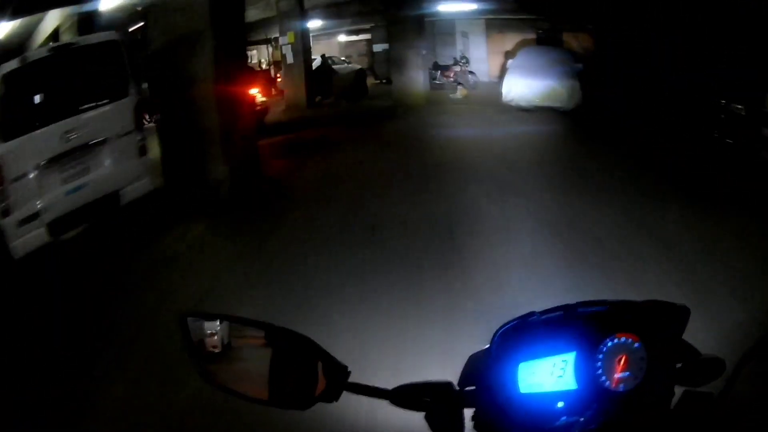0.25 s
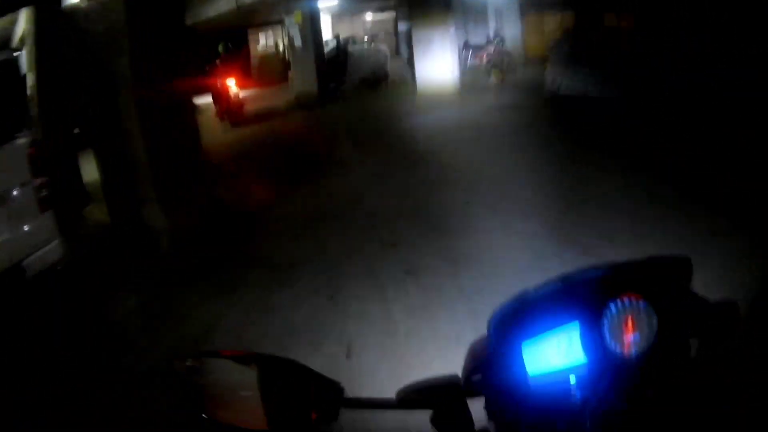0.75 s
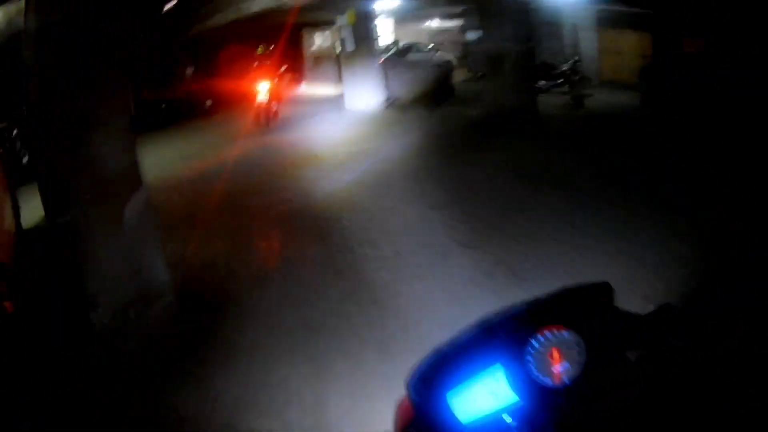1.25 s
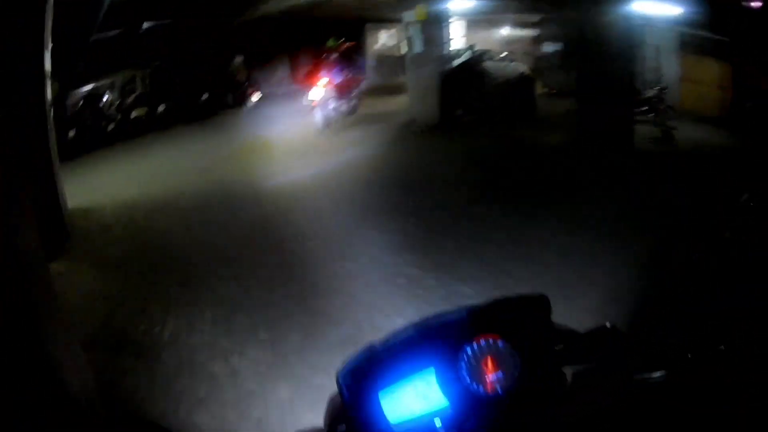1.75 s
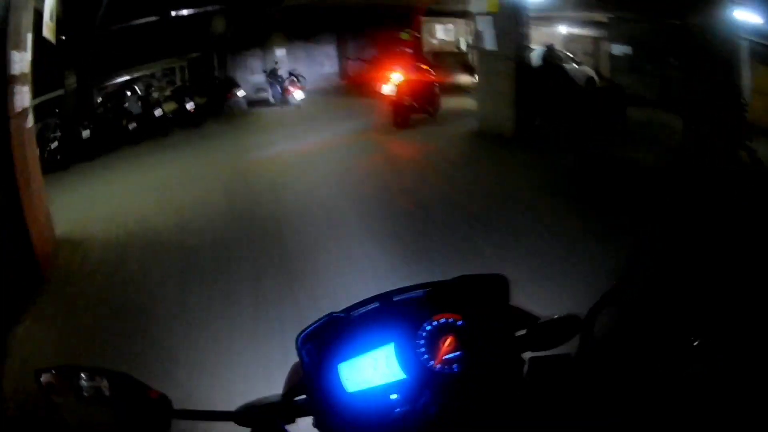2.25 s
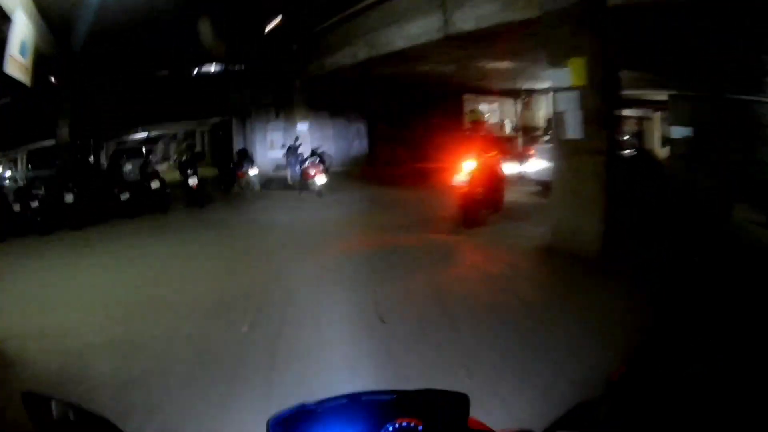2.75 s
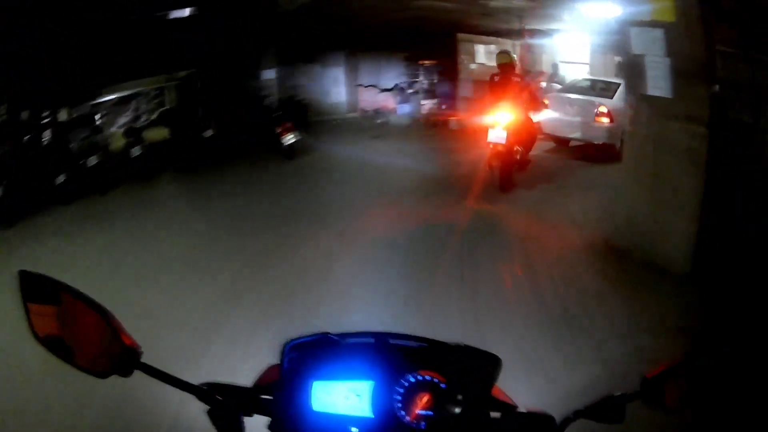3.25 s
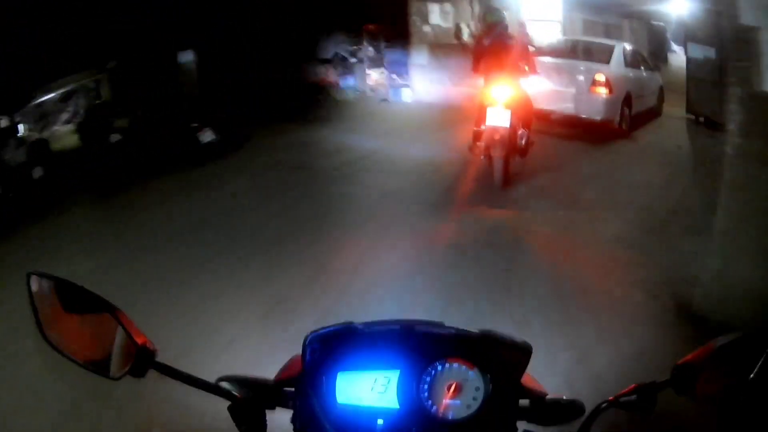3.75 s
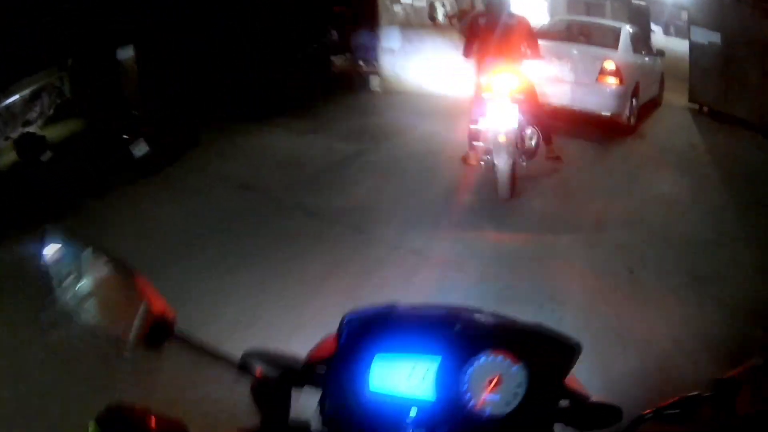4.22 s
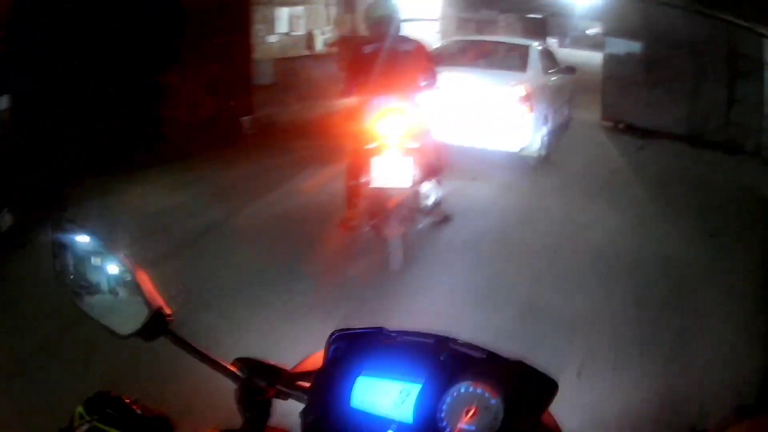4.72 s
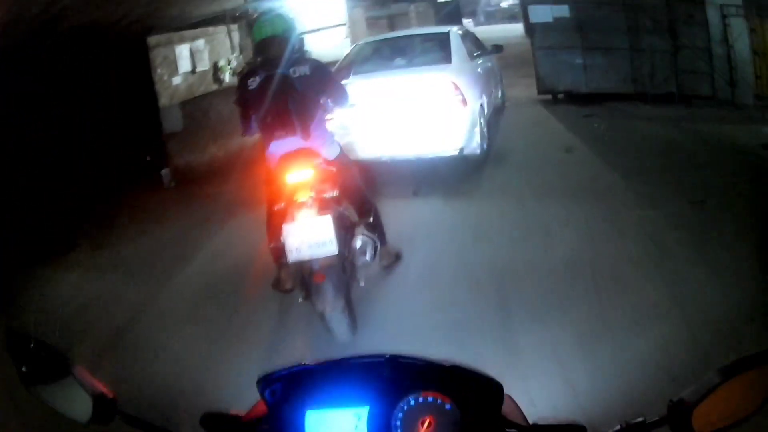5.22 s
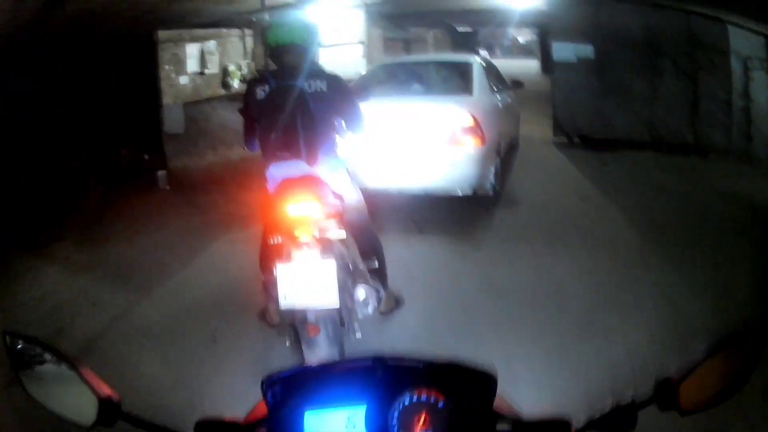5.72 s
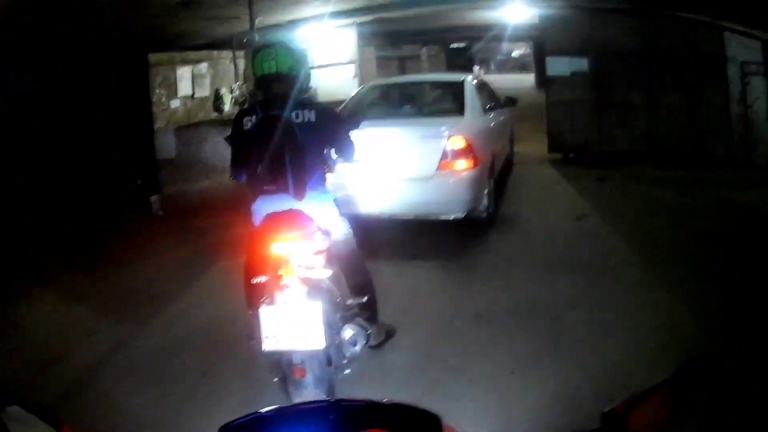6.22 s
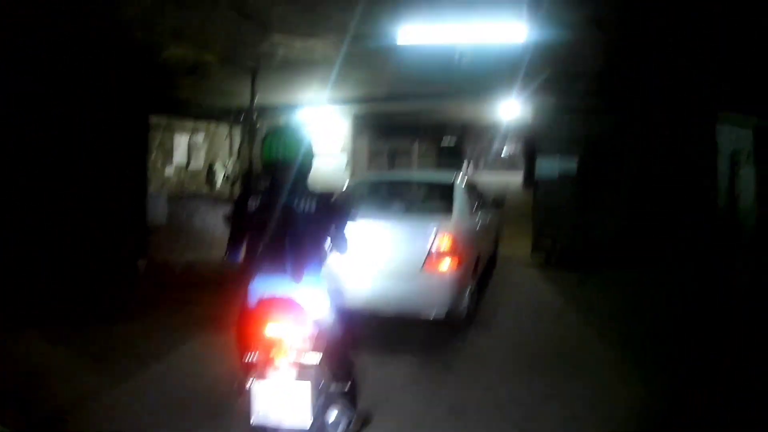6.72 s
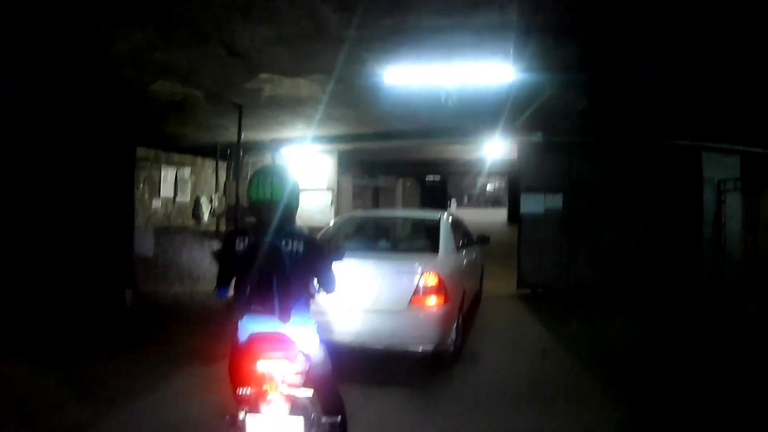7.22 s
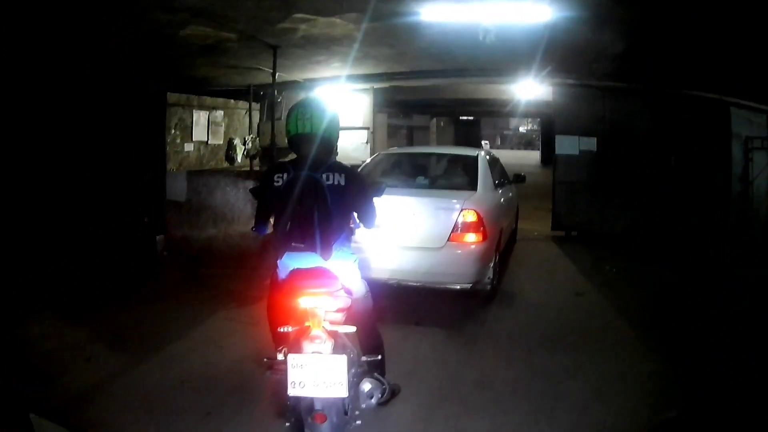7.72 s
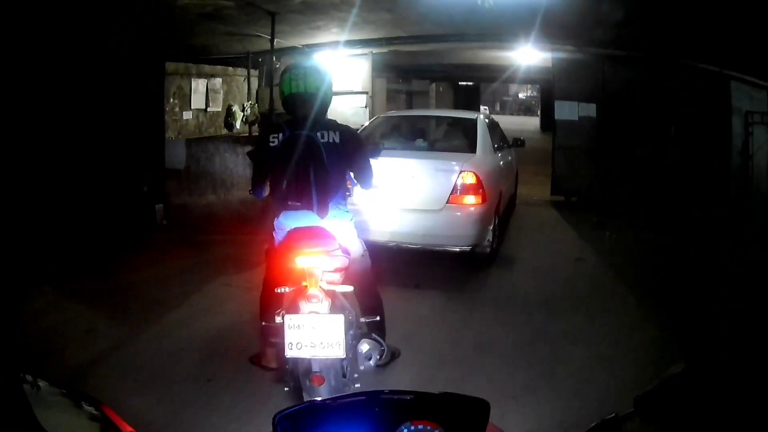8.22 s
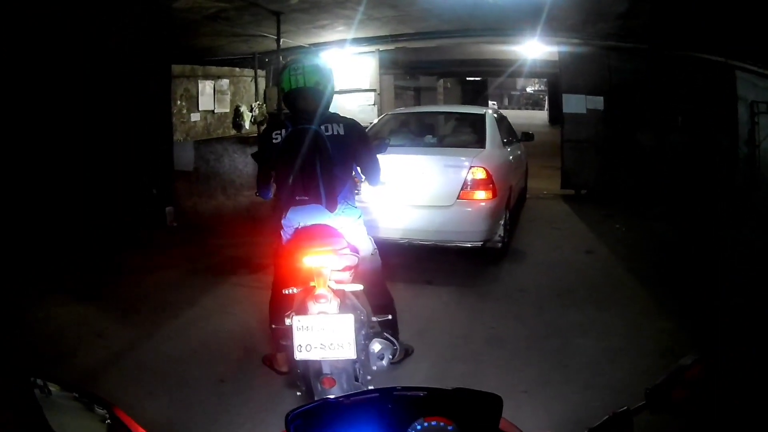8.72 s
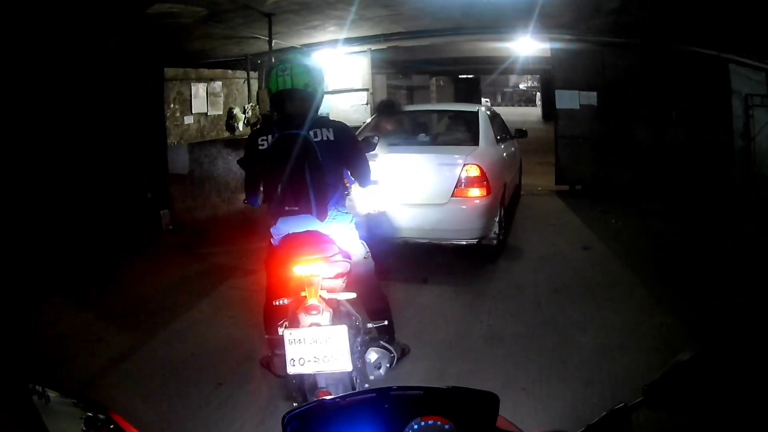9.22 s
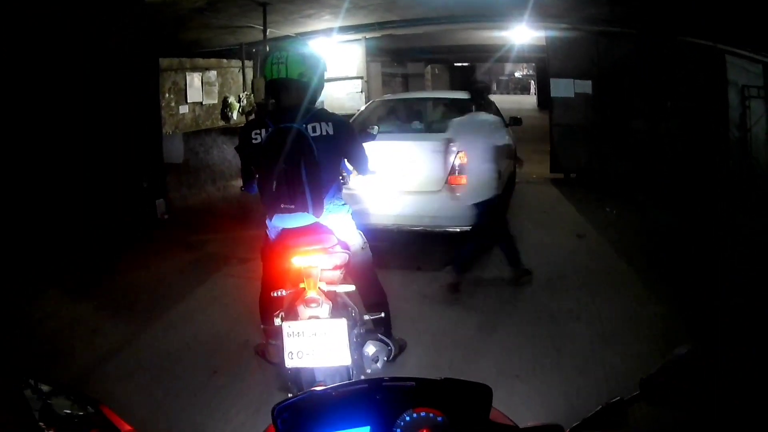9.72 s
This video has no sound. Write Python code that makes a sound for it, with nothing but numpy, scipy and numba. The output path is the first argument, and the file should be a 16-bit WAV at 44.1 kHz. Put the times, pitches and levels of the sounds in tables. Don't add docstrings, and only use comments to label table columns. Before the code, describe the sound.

A single-cylinder motorcycle putters through an echoing concrete garage, revs briefly, bangs once as the throttle shuts, then idles with a faint brake squeal.

```python
import sys
import numpy as np
from scipy import signal
from scipy.fft import rfft, irfft
from scipy.io import wavfile
from scipy.ndimage import uniform_filter1d
from numba import njit

SR = 44100
rng = np.random.default_rng(int(sys.argv[2]) if len(sys.argv) > 2 else 0)


def wav_out(sig):
    wavfile.write(sys.argv[1], SR, np.round(np.clip(np.atleast_2d(sig).T, -1, 1) * 32767).astype(np.int16))


def convert_level_to_amplitude(level_db):
    exponent = np.asarray(level_db, float) / 20
    return 10 ** exponent


N = 439677

# t/s, firings so far
CRANK = [(.005, 0), (1.618, 16), (1.754, 18), (1.926, 21), (2.268, 28), (2.75, 37), (2.959, 40),
         (3.094, 42), (3.443, 45), (3.612, 47), (4.526, 56), (5.272, 64), (5.886, 70), (6.655, 78),
         (7.568, 87), (8.987, 101), (9.306, 105), (9.99, 115)]
MISFIRES = [41, 80, 86, 96, 99]
LEAN_FIRINGS = [0, 10, 36, 60, 61, 64, 66, 67, 68, 72, 79, 82, 90, 92, 100, 103]
# t/s, peak level/dB
HARD_FIRINGS = [(.707, -13), (.82, -12), (.92, -14), (1.08, -14), (8.686, -14), (1.754, -9), (1.825, -8),
                (2.323, -6), (2.365, -6), (2.432, -5), (2.477, -6), (2.543, -6), (2.643, -6), (3.094, -10),
                (3.324, -12), (3.443, -13), (4.526, -10), (4.623, -11), (4.805, -11), (5.098, -11),
                (6.268, -14), (6.655, -13), (6.972, -14), (7.273, -11), (7.568, -10), (7.77, -14),
                (8.987, -8), (7.984, -13), (9.513, -7), (9.779, -11)]
# t/s, peak level/dB
OFF_BEAT = [(.97, -17), (3.077, -11), (3.156, -11), (3.484, -15), (3.567, -16), (3.651, -18), (4.155, -19),
            (4.371, -18), (4.95, -19), (6.113, -18), (6.426, -20), (7.425, -18), (7.718, -18), (8.347, -17),
            (8.454, -19), (8.524, -19), (8.75, -15)]
# t/s, firing peak level/dB, pipe growl level/dB, low pipe mode against growl/dB, valve gear level/dB
ENGINE = [(0, -14.5, -29, -0.5, -45), (.6, -18.5, -28.5, -1.5, -41), (1.4, -17, -31.5, 0.5, -44),
          (1.69, -15, -27.5, 3, -41.5), (1.94, -11.5, -19.5, 2, -39.5), (2.36, -12, -22, 3, -38),
          (2.61, -6, -19.5, 0, -36.5), (2.78, -15.5, -24, -1, -40), (3.2, -15.5, -28, -0.5, -42.5),
          (3.7, -14.5, -30, -0.5, -42.5), (4.14, -15.5, -29, -0.5, -41), (4.89, -17, -27.5, -1.5, -41.5),
          (5.02, -18.5, -23, -4, -41.5), (5.5, -17.5, -29.5, -4, -41), (7.2, -17, -29, -4, -41),
          (8.9, -16.5, -28, -5, -42), (9.15, -13, -26.5, -5.5, -41), (9.97, -12.5, -25.5, -5.5, -40.5)]
# t/s, f/Hz
SILENCER_PITCH = [(0, 93), (1.5, 88.8), (2.1, 106), (2.7, 91), (3.1, 109.4), (3.4, 90.7), (5, 85.7),
                  (7, 94), (8.8, 87.4), (9.2, 111), (9.97, 99.5)]
# f/Hz, width/Hz, level/dB
PIPE_MODES = [(285, 36, -7), (328, 44, 0), (385, 50, -12)]
# f/Hz, width/Hz, level/dB
LOW_PIPE_MODES = [(195, 103, -4), (247.1, 64.2, 1.5)]
# t/s, pitch factor
PIPE_HEAT = [(0, .98), (1.7, 1.0), (1.9, .97), (2.15, 1.06), (2.35, 1.02), (2.55, .94), (2.75, .94),
             (3.2, 1.0), (4.8, .97), (5.1, .94), (5.5, 1.0), (8.8, 1.02), (9.4, 1.06), (9.97, 1.06)]
# t/s, level change/dB
BARKS = [(.3, -3.5), (2.86, 3), (2.06, -1), (3.03, 1.5), (3.33, 0.5), (5.11, -4.5), (6.05, 1.5),
         (6.36, 3.5), (7.19, 3.5), (7.36, -1), (9.33, 1), (9.52, 1.5)]
# t/s, peak level/dB, f/Hz
POPS = [
    (2.929, -1.5, 210),
    (2.872, -13, 260),
    (5.03, -15, 310),
    (6.066, -15, 300),
]
# t/s, firing rate/Hz, silencer drone level/dB
BLIP = [
    (1.55, 13, -80),
    (1.66, 14.4, -34),
    (1.8, 16.8, -25),
    (2.02, 20.7, -21),
    (2.17, 21.8, -24),
    (2.35, 18.7, -20),
    (2.46, 18.05, -21),
    (2.7, 18.0, -21),
    (2.85, 16.3, -50),
]
# order, top t/s, half length/s, level/dB
ORDER_SWELLS = [(13, 1.91, .1, -25), (13, 2.1, .15, -26), (13, 2.5, .1, -22), (13, 2.7, .06, -24),
                (15, 2.39, .1, -20), (15, 2.63, .1, -24), (16, 2.04, .13, -18), (16, 2.2, .1, -25),
                (16, 2.64, .08, -21)]
# t/s, level change/dB
LULL = [
    (1.495, -7),
]
# f/Hz, level/dB per Hz
RUMBLE_COLOUR = [(8.8, -41.5), (15, -9), (86, 0.5), (108, -1.5), (156, -7), (200, -15.5), (260, -33),
                 (440, -120)]
# t/s, level change/dB
BUMPS = [(.04, 3), (.22, -0.5), (1.0, 5), (1.69, 4.5), (2.03, -5.5), (2.9, 9.5), (3.11, 9.5), (3.39, 4.5),
         (6.05, 2), (7.19, 1), (9.3, 2.5), (9.52, 3.5)]
# f/Hz, level/dB per Hz
VALVE_COLOUR = [(260, -42), (440, 0), (488, -10), (610, -15.5), (667, -21), (840, -35.5), (1010, -22.5),
                (1210, -16), (1380, -22.5), (1520, -22.5), (1680, -28.5), (1990, -31), (2600, -46),
                (3380, -78), (5720, -120)]
# f/Hz, level/dB per Hz
FIN_COLOUR = [(1470, -41), (2500, -12.5), (2960, -9), (3280, 1), (3430, -2.5), (3690, -10.5), (4210, -8.5),
              (4990, -16.5), (6650, -22.5), (8000, -34.5), (10400, -48.5), (17600, -120)]
# start t/s, end t/s, f/Hz, start level/dB, end level/dB
SQUEALS = [(6.27, 6.38, 2465, -64, -62), (6.42, 6.72, 2475, -77, -75), (6.65, 6.8, 3294, -52, -51),
           (6.84, 7.08, 3297, -57, -59), (6.65, 6.72, 3450, -56, -54), (6.75, 6.85, 3495, -54, -55),
           (6.77, 6.87, 3590, -55, -52), (6.89, 7.08, 3600, -55, -61), (6.92, 7.07, 4468, -60, -65),
           (7.12, 7.23, 4462, -63, -68), (7.165, 7.2, 3415, -47, -45), (7.22, 7.29, 3438, -38, -37),
           (7.32, 7.37, 3432, -45, -44), (7.39, 7.56, 3441, -48, -55), (7.57, 7.95, 3441, -61, -70)]
# t/s, f/Hz, level/dB
WHISTLE = [
    (5.99, 10520, -92),
    (6.11, 10520, -71),
    (6.46, 10500, -88),
    (6.53, 10520, -66),
    (6.65, 10620, -55),
    (6.9, 10770, -68),
    (7.03, 10665, -56),
    (7.42, 10620, -65),
    (7.72, 10585, -88),
]
# start t/s, end t/s, f/Hz, level/dB
FAINT_SQUEALS = [(6.26, 6.42, 4910, -78), (6.56, 6.85, 4010, -74), (6.63, 6.8, 7300, -75),
                 (6.65, 6.8, 6620, -84), (7.0, 7.25, 2545, -74), (6.92, 7.3, 5760, -81),
                 (7.15, 7.4, 6860, -80), (7.15, 7.4, 7180, -80), (7.17, 7.37, 3760, -66),
                 (6.9, 7.4, 4120, -75), (6.85, 7.05, 8700, -86), (6.45, 6.62, 4420, -79),
                 (6.27, 6.4, 2470, -66), (6.64, 6.8, 3370, -58)]
# t/s, level/dB
SCUFF = [
    (5.77, -80),
    (5.787, -50),
    (5.822, -44),
    (5.865, -48),
    (5.885, -66),
    (6.0, -85),
]
# f/Hz, level/dB per Hz
GRIT_COLOUR = [(900, -30), (1250, -8), (1470, 0), (1790, -12), (2610, -20), (3260, -11), (3800, -19),
               (5950, -31), (8000, -52)]
# t/s, level/dB
DUST = [
    (.43, -94),
    (.49, -72),
    (.59, -68),
    (.7, -74),
    (.8, -91),
]
# f/Hz, level/dB per Hz
DUST_COLOUR = [(3500, -30), (4000, -3), (4500, 0), (5300, -8), (6500, -25)]
# f/Hz, level/dB per Hz
HISS_COLOUR = [(5000, -10.5), (6500, -6), (8500, -1.5), (11500, -2.5), (13000, -1.5), (15000, -2.5),
               (16500, 3.5)]

FIRING_JITTER_S, FIRING_SPREAD_DB, LEAN_LOSS_DB = 0.004035, 1.1, 3.5
IDLE_FIRING_DB, IDLE_VALVE_DB = -17, -43.5
SILENCER_RISE_S = .0088
GROWL_WANDER_DB, BARK_S = 1.25, 0.044
DRONE_ORDER, SWELL_DROP_DB, LULL_S = 5, 10, .018
RUMBLE_DB, RUMBLE_FOLLOWS, RUMBLE_WANDER_DB, BUMP_S = -26.5, 0.82, 1.0, 0.06
FIN_DB, FIN_FOLLOWS = -68, 0.98
HOUSING_HZ, HOUSING_WIDTH_HZ = 1177, 22
SQUEAL_ATTACK_S, SQUEAL_RELEASE_S, SQUEAL_BLUR = .04, .05, .115
FLUTTER_DB, FLUTTER_PER_S, WOBBLE = 3, 30, .0015
GARAGE_T60_S = 1.48
HISS_DB = -76


def rms_one(x):
    return x / np.sqrt(np.mean(x ** 2) + 1e-20)


def in_time(rows, outside=None):
    s, *columns = np.transpose(rows)
    return [np.interp(np.arange(N) / SR, s, c, outside, outside) for c in columns]


def swells(rows, half_s):
    t = np.arange(0, N / SR + .01, .002)
    bells = sum(db * np.exp(-((t - s) / half_s) ** 2) for s, db in rows)
    return np.interp(np.arange(N) / SR, t, bells)


def drift(rate):
    r = np.exp(-2 * np.pi * rate / SR)
    slow = signal.lfilter([1], [1, -2 * r, r * r], rng.standard_normal(N + SR))
    return rms_one(slow[SR:])


def coloured(x, spectrum):
    hz, db = np.transpose(spectrum)
    grid = np.fft.rfftfreq(len(x), 1 / SR) + 1
    gain = convert_level_to_amplitude(np.interp(np.log(grid), np.log(hz), db, -120, -120))
    return rms_one(irfft(rfft(x) * gain, len(x)))


def evened(x, span_s):
    span = round(span_s * SR)
    power = uniform_filter1d(uniform_filter1d(x ** 2, span), span)
    return x / np.sqrt(power + 1e-12)


@njit
def sweep(x, hz, r, step):
    out = np.zeros(len(x))
    for i in range(2, len(x)):
        push = (1 - r * r) / 2 * (x[i] - x[i - 2])
        out[i] = push + 2 * r * np.cos(step * hz[i]) * out[i - 1] - r * r * out[i - 2]
    return out


def resonance(x, hz, width_hz):
    r, step = np.exp(-np.pi * width_hz / SR), 2 * np.pi / SR
    return sweep(sweep(x, hz, r, step), hz, r, step)


def burst(hz, rise_s):
    t = np.arange(round(14 * rise_s * SR)) / SR
    top = 2 * rise_s
    envelope = (t / top) ** 2 * np.exp(2 - 2 * t / top)
    return envelope * np.cos(2 * np.pi * hz * (t - top)), round(top * SR)


def firings():
    crank_s, count = np.transpose(CRANK)
    number = np.setdiff1d(np.arange(count[-1]), MISFIRES)
    chance = rng.standard_normal((len(number), 2))
    s = np.abs(np.interp(number, count, crank_s) + FIRING_JITTER_S * chance[:, 0])
    db = np.interp(s, *np.transpose(ENGINE)[:2]) + FIRING_SPREAD_DB * chance[:, 1]
    db -= LEAN_LOSS_DB * np.isin(number, LEAN_FIRINGS)
    for hard_s, hard_db in HARD_FIRINGS:
        nearest = np.argmin(np.abs(s - hard_s))
        s[nearest], db[nearest] = hard_s, hard_db
    return list(zip(s, db))


def clicks(rows):
    out = np.zeros(N)
    for s, db in rows:
        out[round(s * SR)] += convert_level_to_amplitude(db)
    return out


def silencer(fired_rows, spread=0.036):
    out, pad = np.zeros(N + 2 * SR), SR
    chance = rng.standard_normal((len(fired_rows), 2))
    push, push_top = burst(51, 0.011)
    for (s, db), (detune, stretch) in zip(fired_rows, chance):
        hz = np.interp(s, *np.transpose(SILENCER_PITCH)) * (1 + spread * detune)
        thump, top = burst(hz, SILENCER_RISE_S * convert_level_to_amplitude(0.64 * stretch))
        at = pad + round(s * SR)
        out[at - top:at - top + len(thump)] += convert_level_to_amplitude(db - 3.0) * thump
        at += round(.006 * SR) - push_top
        out[at:at + len(push)] -= convert_level_to_amplitude(db - 14.5) * push
    return out[pad:pad + N]


def gas_flow(fired, decay_s):
    t = np.arange(round(6 * decay_s * SR)) / SR
    puff = signal.fftconvolve(fired, t / decay_s * np.exp(-t / decay_s))[400:400 + N]
    return evened(np.abs(puff), 0.13)


def pipe(fired, modes, heat, level_db, rough=0.49, throb=0.056):
    turbulence = gas_flow(fired, 0.019) * rng.standard_normal(N)
    drive = (1 - rough) * evened(fired, 0.11) + rough * turbulence
    rung = np.zeros(N)
    for k, (hz, width_hz, db) in enumerate(modes):
        rung += (-1) ** k * convert_level_to_amplitude(db) * resonance(drive, hz * heat, 1.5 * width_hz)
    wet = .6
    both = np.sqrt(1 - wet) * rung + np.sqrt(wet) * garage(rung)
    throbbing = both * (1 - throb + throb * gas_flow(fired, 0.13))
    return convert_level_to_amplitude(level_db) * evened(throbbing, 0.11)


def pops():
    out = np.zeros(N)
    for s, db, hz in POPS:
        bang, top = burst(hz, .5 / hz)
        at = round(s * SR) - top
        out[at:at + len(bang)] += convert_level_to_amplitude(db) * bang
    return out


def orders(fired_rows):
    per_s, drone_db = in_time(BLIP)[0], in_time(BLIP, -140)[1]
    turns, t = 2 * np.pi * np.cumsum(per_s) / SR, np.arange(N) / SR
    tones = np.zeros(N)
    for order, top_s, half_s, db in ORDER_SWELLS:
        swell_db = db - SWELL_DROP_DB * ((t - top_s) / half_s) ** 2
        tones += convert_level_to_amplitude(swell_db) * np.sin(np.round(order) * turns)
    fired_s = np.sort([s for s, db in fired_rows])
    swings = np.round(np.diff(fired_s) * DRONE_ORDER * per_s[(fired_s[1:] * SR).astype(int)])
    count = np.interp(t, fired_s, np.r_[0, np.cumsum(swings)])
    drone = convert_level_to_amplitude(drone_db - 5.5) * np.cos(2 * np.pi * count)
    return np.sqrt(2) * (tones + drone)


def frame_rumble(firing_db):
    level_db = RUMBLE_DB + RUMBLE_FOLLOWS * (firing_db - IDLE_FIRING_DB)
    level_db = level_db + RUMBLE_WANDER_DB * drift(3.7) + swells(BUMPS, BUMP_S)
    return convert_level_to_amplitude(level_db) * coloured(rng.standard_normal(N), RUMBLE_COLOUR)


def valve_gear(fired, spectrum, level_db, pulsed):
    ticks = rng.standard_normal(N) * convert_level_to_amplitude(0.99 * drift(40))
    pulsing = 1 - pulsed + pulsed * gas_flow(fired, 0.049)
    return convert_level_to_amplitude(level_db) * coloured(ticks * pulsing, spectrum)


def rattle(fired, valve_db):
    valves = valve_gear(fired, VALVE_COLOUR, valve_db, pulsed=0.09)
    valves += convert_level_to_amplitude(-0.5) * resonance(valves, HOUSING_HZ * np.ones(N), HOUSING_WIDTH_HZ)
    fin_db = FIN_DB + FIN_FOLLOWS * (valve_db - IDLE_VALVE_DB)
    return valves + valve_gear(fired, FIN_COLOUR, fin_db, pulsed=0.22)


def squeal_mode(hz, db, blur_hz, clean):
    on = db > -130
    phase = 2 * np.pi * np.cumsum((hz * np.ones(N))[on]) / SR
    skirt = signal.butter(4, blur_hz, fs=SR, output="sos")
    real, imaginary = map(rms_one, signal.sosfilt(skirt, rng.standard_normal((2, on.sum()))))
    beating = np.sqrt(2 * clean) + np.sqrt(1 - clean) * (real + 1j * imaginary)
    out = np.zeros(N)
    out[on] = np.real(beating * np.exp(1j * phase))
    return convert_level_to_amplitude(db) * out


def brake():
    held = []
    for start, end, hz, db, end_db in SQUEALS:
        shape = [(start - SQUEAL_ATTACK_S, db - 20), (start, db),
                 (end, end_db), (end + SQUEAL_RELEASE_S, end_db - 20)]
        held.append((hz, in_time(shape, -160)[0]))
    held.append((in_time(WHISTLE)[0], in_time(WHISTLE, -160)[1]))
    out, wobble = np.zeros(N), 1 + WOBBLE * drift(8)
    for hz, level_db in held:
        level_db = level_db + FLUTTER_DB * np.clip(drift(FLUTTER_PER_S), -3, 1.5)
        blur_hz = SQUEAL_BLUR * np.mean(hz) ** .75
        out += squeal_mode(hz * wobble, level_db, blur_hz, clean=.55)
    for start, end, hz, db in FAINT_SQUEALS:
        shape = [(start - .03, db - 25), (start + .03, db), (end - .05, db - 3), (end + .05, db - 25)]
        level_db, = in_time(shape, -140)
        out += convert_level_to_amplitude(0.2) * squeal_mode(hz, level_db, blur_hz=.012 * hz, clean=.2)
    return convert_level_to_amplitude(0.5) * out + convert_level_to_amplitude(-16.0) * garage(out)


def scrape(rows, colour):
    grit = rng.standard_normal(N) * convert_level_to_amplitude(2 * drift(150))
    return convert_level_to_amplitude(in_time(rows, -140)[0]) * coloured(grit, colour)


def garage(x, delay_s=0.062):
    t = np.arange(round(1.5 * SR)) / SR
    tail = rng.standard_normal(len(t)) * convert_level_to_amplitude(-60 * t / GARAGE_T60_S) * (t > delay_s)
    return signal.fftconvolve(x, tail / np.sqrt(np.sum(tail ** 2)))[:N]


def microphone_hiss():
    return convert_level_to_amplitude(HISS_DB) * coloured(rng.standard_normal(N), HISS_COLOUR)


def scene():
    firing_db, growl_db, low_db, valve_db = in_time(ENGINE)
    own = firings()
    fired, thump = clicks(own + OFF_BEAT), silencer(own + OFF_BEAT)
    upper_db = growl_db + GROWL_WANDER_DB * drift(4) + swells(BARKS, BARK_S)
    lower_db = growl_db + low_db + GROWL_WANDER_DB * drift(2.8)
    growl = pipe(fired, PIPE_MODES, in_time(PIPE_HEAT)[0], upper_db)
    growl += pipe(fired, LOW_PIPE_MODES, np.ones(N), lower_db)
    low = thump + convert_level_to_amplitude(-7.5) * garage(thump) + growl + pops() + orders(own) + frame_rumble(firing_db)
    low = low * convert_level_to_amplitude(swells(LULL, LULL_S))
    scrapes = scrape(SCUFF, GRIT_COLOUR) + scrape(DUST, DUST_COLOUR)
    return (low + rattle(fired, valve_db) + brake() + scrapes)[None]


def band_limit(x):
    return signal.sosfilt(signal.butter(12, 15500, fs=SR, output="sos"), x)


def record(dry):
    headroom = 3.0
    mix = headroom * np.tanh((dry + microphone_hiss()) / headroom)
    return band_limit(mix)


dry = scene()
out = record(dry)
wav_out(out)
```